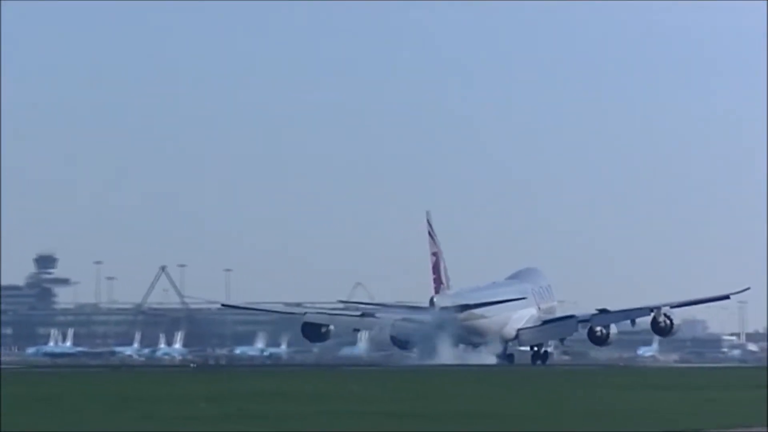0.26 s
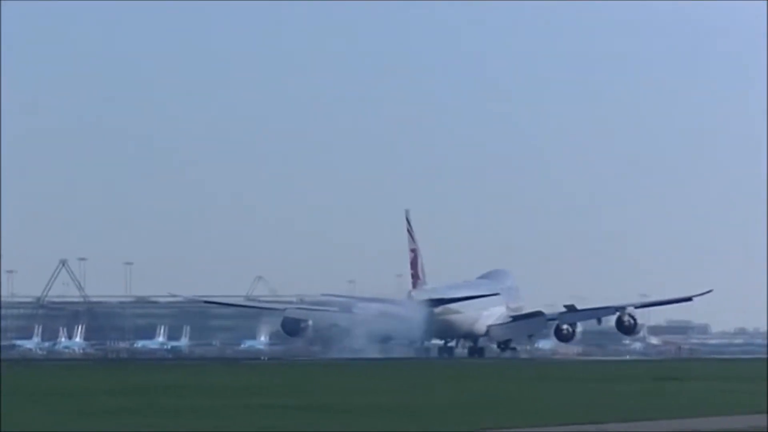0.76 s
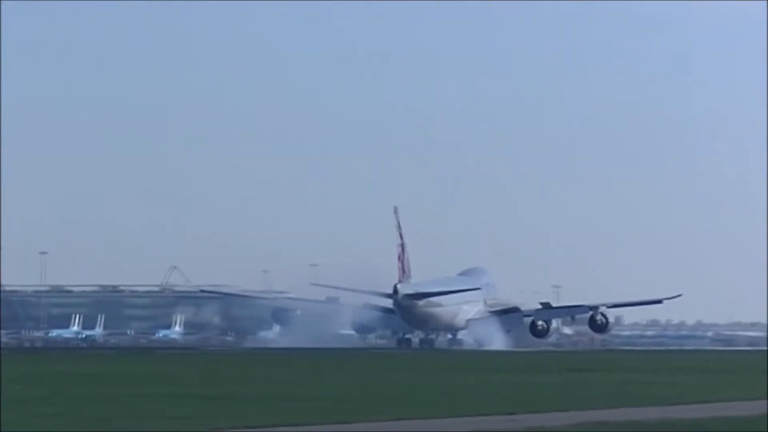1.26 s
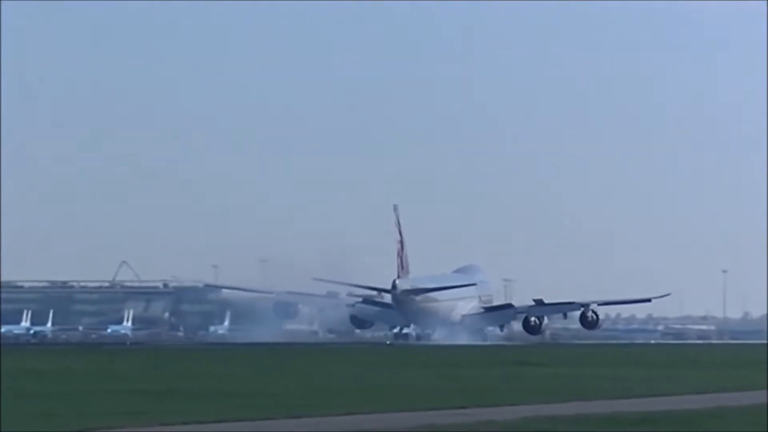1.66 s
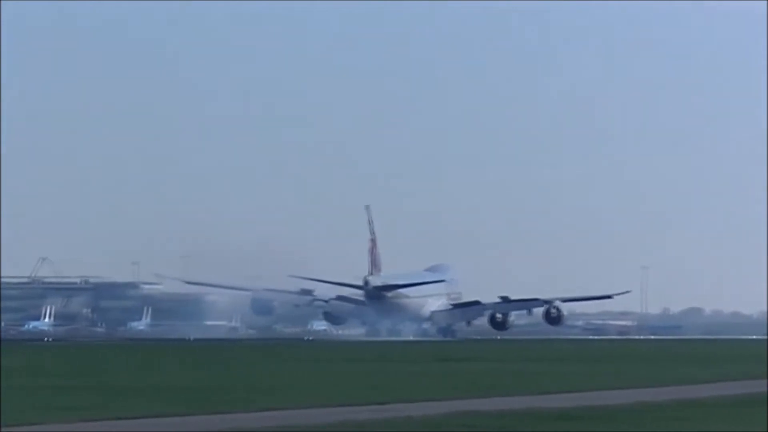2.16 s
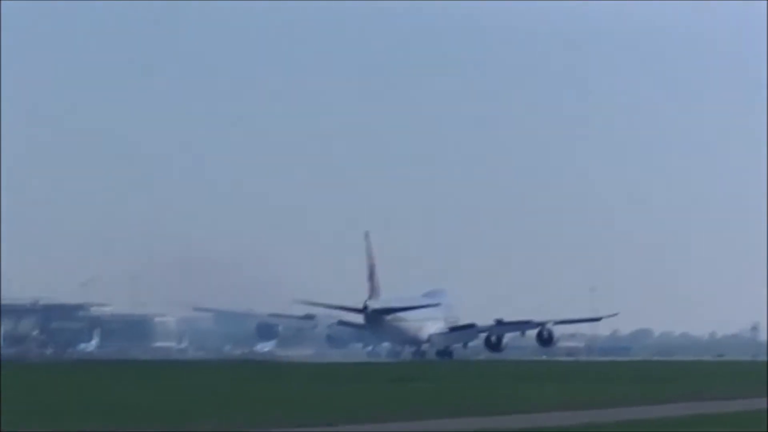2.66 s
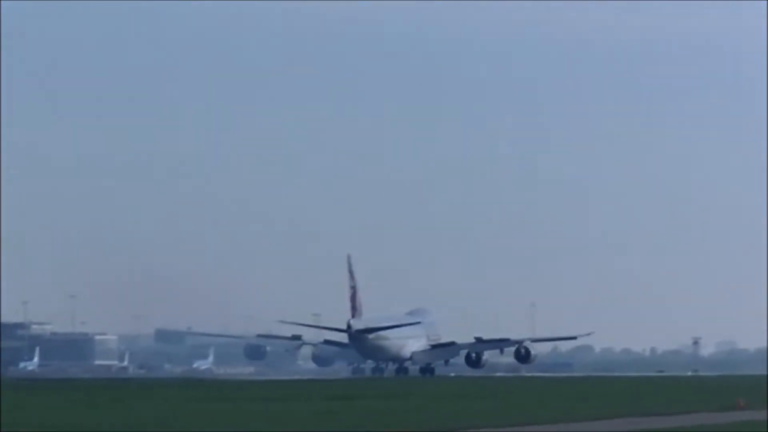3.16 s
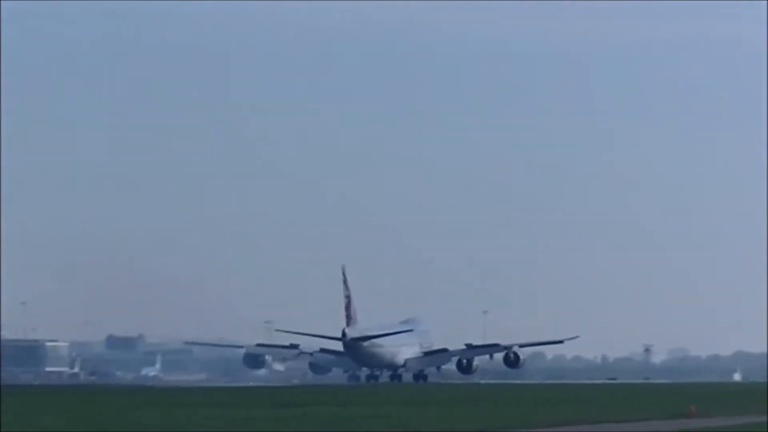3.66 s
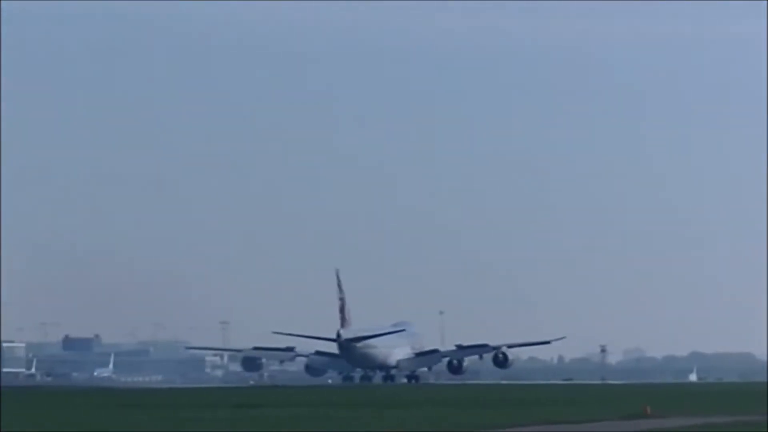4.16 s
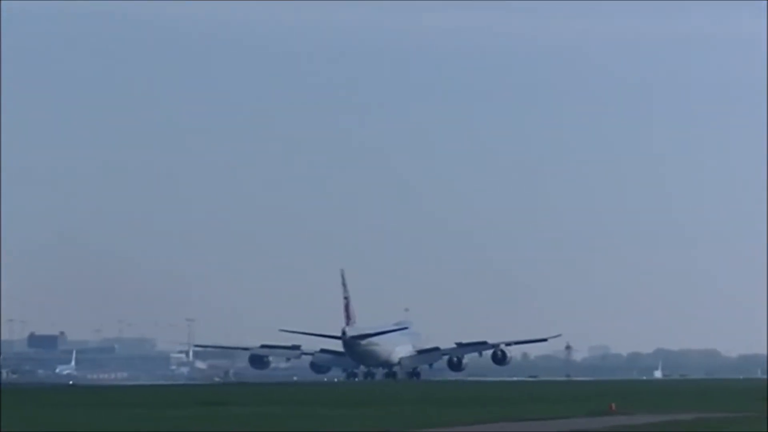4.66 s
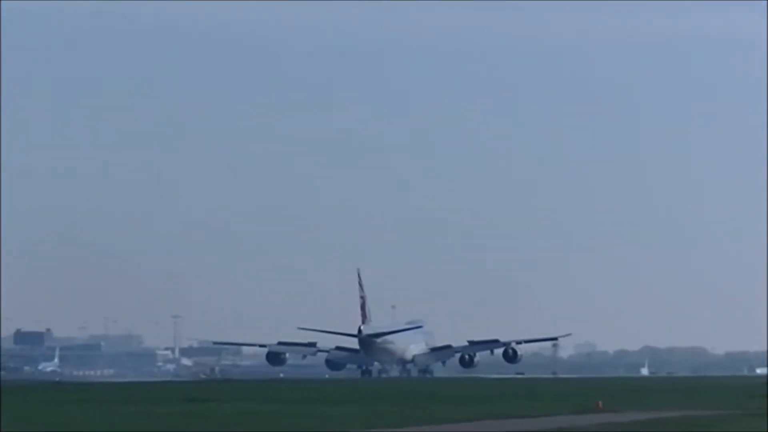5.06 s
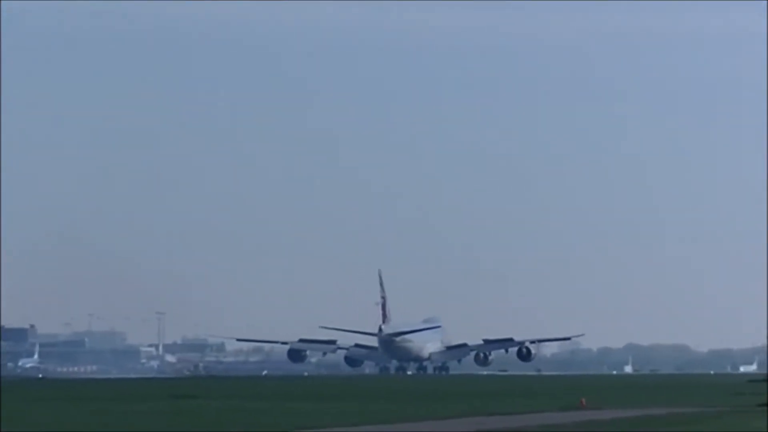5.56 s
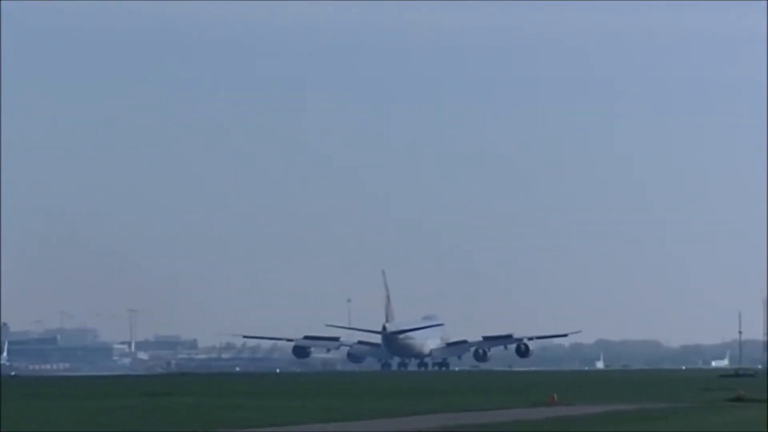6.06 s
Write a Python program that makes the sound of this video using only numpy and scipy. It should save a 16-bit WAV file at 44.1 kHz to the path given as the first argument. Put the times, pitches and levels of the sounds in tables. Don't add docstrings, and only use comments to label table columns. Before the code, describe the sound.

Beside an open runway, a large four-engined jet is already rolling away as the sound begins. From 0 to 2 s a broad, breathy fan rush fades gradually over a mid-low roar, while quick chirps, chips and thin high whistles come from small birds in the grass. The low exhaust rumble wavers with gusty air, lifting around 1.2 s. From 2 to 4 s a nearer bird sings liquid glides, with a short rolling run at 2.6 s; meanwhile the rumble swells to its strongest at about 3.2 to 4.2 s, with soft, rounded thuds. It dips near 5 s, then surges again as the engine rush rises slightly. Chattering birds continue, with falling stepped calls around 5.4 to 5.7 s and a high wavering whistle after 6 s. Faint hiss, thin electronic whine and tiny ticks sit close, the clearest tick at 6.1 s. It stops abruptly around 6.3 s, mid-roar.

```python
import sys
import numpy as np
from scipy import signal
from scipy.io import wavfile
from scipy.ndimage import uniform_filter1d

SR = 44100
rng = np.random.default_rng(int(sys.argv[2]) if len(sys.argv) > 2 else 0)


def transcribe(signal):
    frames = np.atleast_2d(signal).T
    limited = np.clip(frames, -1, 1)
    pcm = np.round(limited * 32767).astype(np.int16)
    wavfile.write(sys.argv[1], SR, pcm)


def amplitude_ratio(level_db):
    exponent = np.asarray(level_db, float) / 20
    return 10 ** exponent


N = 278712

# (time [s], level [dB])
EXHAUST_SWELL = [(0, -38.5), (.36, -35), (.9, -38.5), (1.15, -29), (1.48, -35), (1.66, -31), (1.83, -34.5),
                 (2.15, -32), (2.35, -31), (3.15, -27.5), (3.4, -29), (3.62, -25.5), (4.15, -25.5),
                 (4.95, -32), (5.2, -26), (5.42, -28.5), (6.1, -29.5), (6.32, -31)]
# (frequency [Hz], density [dB per Hz])
RUMBLE_SPECTRUM = [(25, -48), (50, -66), (100, -32), (160, -16.5), (240, -8.5), (310, -1.5), (365, 5),
                   (410, -4), (470, -7), (600, -16), (900, -65.5), (2000, -120)]
CORE_SPECTRUM = [(60, -70.5), (200, -39.5), (430, -4.5), (520, -1), (750, 0.5), (1000, -4.5), (1200, -8.5),
                 (1400, -14), (1700, -50.5), (4000, -120)]
RUSH_SPECTRUM = [(400, -70.5), (1100, -36), (1400, -1.5), (1700, 3.5), (2000, -3), (2600, -5.5),
                 (2900, -14.5), (4300, -17), (4800, -23), (5300, -29), (6500, -42), (12000, -100)]
BLADE_SPECTRUM = [(900, -61), (2000, -20), (3000, -1), (4300, -1.5), (4800, -6), (5300, -16.5), (7000, -29),
                  (12000, -91.5)]
# (frequency [Hz], density [dB per Hz])
HISS_SPECTRUM = [(20, 9), (60, -2), (300, -18), (5500, -0.5), (6300, -1), (7300, -3), (13900, -11),
                 (14600, -14.5), (15500, -23), (16500, -58)]
# (frequency [Hz], likeness [0-1])
LIKENESS = [(40, .5), (65, .85), (110, .98), (290, 1), (640, .99), (1400, .85), (1800, .94), (2700, .86),
            (5500, .88)]
# (frequency [Hz], lead [rad])
LEAD = [(60, -1.1), (130, -.7), (400, -.03), (1050, .3), (1400, 1.), (2100, .1), (3200, .45), (4800, .15)]
# (frequency [Hz], left minus right [dB])
TILT = [(60, 4.5), (150, 1.5), (380, -1.2), (950, -2.5), (2380, -2), (5980, -2), (15000, 1)]
# (frequency [Hz], level [dB rms])
WHINE = [(7800, -89), (7825, -86.5)]
# (time [s], from [Hz], to [Hz], level [dB])
FLICKS = [(.023, 5780, 3980, -60), (.102, 6980, 4880, -69), (.4, 4800, 4400, -58), (.755, 4500, 3080, -59),
          (.91, 4980, 4080, -60), (1.004, 6120, 7420, -71), (1.056, 4780, 6780, -71),
          (2.969, 3760, 2850, -57), (1.998, 5720, 4720, -69), (2.082, 3400, 3900, -57),
          (2.122, 3800, 4500, -59), (2.316, 5000, 3600, -58), (6.125, 3300, 2700, -60),
          (3.16, 5080, 3780, -61), (3.476, 4020, 2920, -50), (3.693, 3510, 2860, -52),
          (3.819, 3880, 2840, -49), (4.823, 4350, 3600, -54), (4.718, 5700, 4080, -66),
          (4.801, 3000, 4300, -57), (4.932, 5480, 3600, -62), (5.04, 5580, 4180, -64),
          (5.186, 7200, 7500, -72), (5.295, 5480, 3080, -61), (5.913, 5000, 4100, -61),
          (6.015, 6500, 7400, -76), (6.055, 6580, 5580, -71), (6.24, 4620, 3820, -61),
          (.535, 6850, 6420, -67)]
# (time [s], length [s], from [Hz], to
# [Hz], level [dB])
CHATTER = [(.16, .08, 3480, 3420, -61), (.53, .03, 3250, 3700, -59), (.735, .015, 4100, 4700, -60),
           (.82, .015, 4450, 4200, -53), (.87, .03, 4300, 4150, -61), (1.147, .02, 5350, 5820, -70),
           (1.235, .015, 5850, 5400, -71), (1.32, .04, 5200, 5200, -68), (1.485, .03, 4300, 3950, -60),
           (1.625, .035, 4050, 3500, -58), (1.69, .015, 3450, 3350, -58), (2.285, .02, 6200, 6800, -71),
           (2.36, .015, 4000, 3300, -62), (2.398, .014, 3950, 3950, -62), (2.47, .012, 3900, 3900, -62),
           (2.568, .012, 4400, 4300, -61), (2.585, .012, 4000, 3950, -60), (3.012, .01, 3900, 3700, -60),
           (3.18, .03, 5300, 5300, -67), (3.225, .012, 6050, 5700, -64), (3.5, .03, 3820, 3800, -62),
           (3.72, .008, 2900, 3400, -57), (3.672, .045, 4350, 4250, -63), (4.3, .028, 3600, 3780, -59),
           (4.338, .025, 3820, 3480, -58), (4.38, .015, 4550, 4500, -56), (4.412, .018, 4200, 4300, -56),
           (4.468, .026, 3680, 3620, -60), (4.518, .037, 4450, 3400, -59), (4.562, .008, 4200, 3200, -60),
           (4.615, .026, 4300, 3850, -54), (4.642, .01, 3900, 3600, -53), (4.652, .008, 3600, 4050, -53),
           (4.66, .012, 4000, 3650, -54), (4.9, .04, 4200, 3650, -60), (5.07, .02, 3700, 3600, -61),
           (5.225, .015, 4200, 3800, -60), (5.41, .015, 7400, 6850, -72), (5.71, .025, 6000, 6000, -72),
           (5.3, .012, 4300, 4200, -57)]
# (time [s], peak [dB])
BUFFETS = [(0.243, -21.5), (0.668, -21), (1.097, -20), (1.174, -16.5), (1.576, -22), (1.617, -18.5),
           (1.659, -20), (1.946, -19.5), (1.998, -20), (2.112, -21), (2.403, -17.5), (2.532, -24.5),
           (2.692, -21), (2.774, -15), (2.934, -19), (3.207, -11.5), (3.315, -16), (3.349, -23),
           (3.46, -15), (3.634, -11.5), (3.771, -15), (3.879, -18.5), (4.105, -17.5), (4.165, -16.5),
           (4.267, -20.5), (4.318, -19), (4.774, -15.5), (4.856, -21), (5.081, -18), (5.14, -16.5),
           (5.263, -18), (5.356, -20), (5.448, -22), (5.577, -17), (5.675, -18), (5.782, -21),
           (5.95, -20.5), (6.014, -17), (6.114, -27), (6.22, -23)]
# (time [s], length [s], centre [Hz], swing [Hz], level [dB])
TRILLS = [(.592, 0.036, 3480, 684, -51.5), (0.6, .06, 6400, 505, -75), (1.43, 0.06, 4360, 120, -57),
          (.3, 0.048, 4200, 903, -59.5), (.755, 0.028, 3450, 600, -56), (1.15, .1, 5550, 400, -71.5),
          (4.38, .05, 4200, 500, -61.5), (4.4, .045, 3600, 700, -59.5), (5.49, .04, 4200, 500, -60),
          (.63, .06, 5700, 500, -72), (4.03, .09, 5300, 430, -71.5), (1.565, 0.022, 6200, 1400, -70),
          (1.853, .11, 3860, 780, -60.5), (1.852, .065, 5440, 200, -69), (2.17, .048, 6000, 1810, -67.5),
          (2.945, 0.028, 6200, 1500, -73), (4.05, 0.12, 4090, 500, -64), (5.047, .04, 3960, 884, -65),
          (5.13, .17, 4230, 296, -64.5), (3.643, 0.066, 4600, 899, -68.5), (4.64, 0.04, 4300, 500, -61.5),
          (5.196, .075, 3540, 300, -58.5), (5.575, .051, 3440, 795, -55.5), (5.64, .1, 5560, 604, -76),
          (5.985, 0.027, 5700, -1000, -69.5), (2.285, .045, 6600, 599, -71.5), (1.43, .05, 4750, 400, -63),
          (5.74, .056, 3460, 905, -57)]
# (time [s], length [s], from [Hz], to [Hz], level [dB])
WARBLER = [(.325, .08, 3080, 2990, -52), (.833, .036, 4220, 4330, -52), (1.515, .06, 3880, 3470, -52),
           (1.527, .04, 4220, 4310, -53), (1.585, .041, 3600, 3450, -59), (1.994, .061, 2450, 2750, -55),
           (2.14, .014, 3450, 3700, -49), (2.154, .032, 3700, 2770, -47), (2.188, .032, 2770, 3800, -47),
           (2.216, .024, 3780, 3850, -44), (2.368, .014, 2980, 3200, -52), (2.382, .036, 3200, 2760, -48),
           (2.51, .04, 4150, 4570, -52), (2.83, .055, 3010, 3510, -47), (2.946, .024, 3920, 3760, -51),
           (2.981, .02, 2830, 2950, -55), (3.172, .028, 3760, 3800, -55), (3.271, .074, 2800, 3000, -50),
           (3.357, .042, 3120, 2950, -50), (3.451, .032, 3780, 3850, -46), (3.599, .078, 3420, 3220, -45),
           (3.672, .024, 3400, 3510, -50), (3.705, .014, 2860, 2860, -49), (3.796, .027, 4070, 3900, -45),
           (3.834, .048, 2780, 2880, -47), (3.974, .026, 2720, 3210, -47), (3.998, .018, 3210, 2580, -47)]
# (time [s], peak [dB], ring [Hz], decay t60 [s], broad snap over ring [ratio])
TICKS = [(.409, -50, 4600, .012, .5), (1.521, -58, 8500, .015, 2.2), (3.219, -63, 6500, .015, 2.2),
         (3.311, -60, 8500, .015, 2.2), (3.551, -57, 8100, .015, 1.8), (4.289, -68, 7500, .12, 3),
         (4.871, -58, 6500, .012, 1.2), (6.107, -40, 1850, .045, .07), (6.108, -51, 3400, .012, .2),
         (6.182, -52, 4200, .012, .4), (2.447, -54, 3000, .012, .8)]
# (time [s], length [s], from [Hz], to [Hz], level [dB])
WHISTLES = [(.548, .024, 6420, 6420, -66), (.467, .045, 5620, 5470, -63), (.57, .13, 6560, 6660, -63),
            (1.027, .018, 7190, 7210, -74), (1.165, .07, 5820, 5850, -71), (1.955, .045, 5940, 5960, -62),
            (2.03, .06, 5940, 5940, -72), (2.3, .03, 6900, 6600, -68), (2.43, .026, 3920, 3920, -57),
            (2.821, .09, 5800, 5060, -67), (2.975, .04, 5300, 5300, -72), (3.12, .075, 5230, 5300, -60),
            (3.235, .075, 5300, 5020, -67), (3.31, .046, 5250, 5300, -68), (3.599, .031, 4350, 4350, -64),
            (3.692, .031, 3950, 3850, -58), (4.274, .046, 3650, 3700, -58), (5.78, .08, 3600, 4050, -62),
            (5.928, .152, 4950, 4300, -56)]
# (time [s], pitch [Hz], level [dB])
ARCS = [
    [(1.085, 5350, -66), (1.12, 5230, -60), (1.19, 5210, -55), (1.24, 5200, -58), (1.305, 5170, -66)],
    [(5.322, 3180, -62), (5.35, 2960, -55), (5.385, 2900, -53), (5.43, 2960, -56), (5.475, 3060, -63)],
    [(6.066, 5850, -64), (6.09, 5450, -55), (6.15, 5200, -54), (6.18, 5290, -55), (6.24, 5230, -58),
     (6.26, 5170, -55), (6.32, 5230, -56)],
]
# (time [s], pitch [Hz], level [dB])
CHIPS = [(3.38, 5700, -70), (3.43, 5700, -70), (3.51, 5700, -71), (3.59, 5700, -71), (3.63, 5700, -71),
         (4.393, 4150, -55), (4.4, 4300, -52), (4.406, 3850, -56), (4.574, 3320, -52), (4.812, 4350, -58),
         (4.829, 3730, -49), (4.844, 3400, -57), (5.547, 4370, -61), (5.569, 4350, -58), (5.732, 4420, -60)]
SEE_STARTS_S = [3.684, 3.866, 4.068, 4.268]
# (delay [s], length [s], from [Hz], to [Hz], level [dB])
SEE_PARTS = [
    (0, .066, 6920, 6610, -71),
    (.066, .07, 6650, 6650, -78),
]
STEP_STARTS_S = [5.4, 5.488, 5.58, 5.675]
# (delay [s], length [s], from [Hz], to [Hz], level [dB])
STEP_PARTS = [
    (0, .012, 6600, 5550, -68),
    (.017, .012, 4270, 4050, -55),
    (.037, .008, 3730, 3530, -57),
]


def evened(x):
    return x / np.sqrt(np.mean(x ** 2) + 1e-20)


def read(points, hz):
    f, value = np.transpose(points)
    return np.interp(np.log(hz + 1), np.log(f + 1), value)


def add(mix, s, sound):
    part = mix[:, round(s * SR):][:, :sound.shape[1]]
    part += sound[:, :part.shape[1]]


def drift(count, size):
    return evened(uniform_filter1d(rng.standard_normal(count), size=size))


def noise(spectrum, likeness, patchy_db, swell_db):
    frames, hz = N // 256 + 5, np.fft.rfftfreq(1024, 1 / SR)
    a, b, c, d, patches = rng.standard_normal((frames, len(hz), 5)).T
    patches = uniform_filter1d(patches, size=10, axis=0)
    patches = evened(uniform_filter1d(patches, size=16, axis=1))
    t = np.arange(frames) * 256 / SR
    gust_hz = np.geomspace(3, 18, num=20)
    swell = evened(sum(np.sin(2 * np.pi * (f * t + rng.random())) / np.sqrt(f) for f in gust_hz))
    same = np.clip(likeness * read(LIKENESS, hz), 0, 1)[:, None]
    left = a + 1j * b
    right = same * left + np.sqrt(1 - same ** 2) * (c + 1j * d)
    ports = amplitude_ratio(read(TILT, hz) / 2) * np.exp(.5j * read(LEAD, hz))
    z = np.array([left, right]) * np.array([ports, 1 / ports])[:, :, None]
    z *= amplitude_ratio(read(spectrum, hz)[:, None] + patchy_db * patches + swell_db * swell)
    return evened(signal.istft(z, nperseg=1024, noverlap=768)[1][:, :N])


def whistle(hz, db, hoarse_hz=25):
    flutter, wobble = drift(len(hz), 120), drift(len(hz), 120)
    soft = signal.windows.tukey(len(hz), min(1, 0.0083 * SR / len(hz)))
    phase = 2 * np.pi * (np.cumsum(hz + hoarse_hz * wobble) / SR + rng.random())
    pan_db, lead_rad = -1.5, .5
    if hz.mean() >= 4900:
        pan_db, lead_rad = rng.choice([(-3.5, -1.5), (2.5, -1.2), (1.5, 1.1)])
    side = np.array([[.5], [-.5]])
    level = np.sqrt(2) * amplitude_ratio(db + side * pan_db) * (1 + .22 * flutter) * soft
    return level * np.sin(phase + side * lead_rad)


def breath(u, peak, ends_db):
    return 1.5 + ends_db * np.where(u < peak, 1 - u / peak, (u - peak) / (1 - peak)) ** 2


def slurs(events):
    out = np.zeros((2, N))
    for s, length_s, from_hz, to_hz, db in events:
        u = np.linspace(-.1, 1.1, round(1.2 * length_s * SR))
        hz = from_hz + (to_hz - from_hz) * u
        add(out, s - .1 * length_s, whistle(hz, db + 1.3, hoarse_hz=50))
    return out


def calls(starts_s, parts):
    return slurs([(s + delay_s, *part) for s in starts_s for delay_s, *part in parts])


def jet():
    t = np.arange(N) / SR
    rumble_db = np.interp(t, *np.transpose(EXHAUST_SWELL))
    swell_db = rumble_db - rumble_db[0]
    away = 1 - np.exp(-t / 1.28)
    spool_s = np.maximum(t - 4.82, 0)

    def fan_gain(first_db, lost_db, spool_db_per_s, swell_share):
        return amplitude_ratio(first_db - lost_db * away + spool_db_per_s * spool_s + swell_share * swell_db)

    rumble = amplitude_ratio(rumble_db) * noise(RUMBLE_SPECTRUM, 0.99, patchy_db=1.13, swell_db=0.42)
    core = fan_gain(-38.5, 6.5, 3, 0.2548) * noise(CORE_SPECTRUM, 1, patchy_db=1.2, swell_db=0.1)
    rush = fan_gain(-42.5, 8.5, 2.5, -0.0315) * noise(RUSH_SPECTRUM, 0.98, patchy_db=0.68, swell_db=0.04)
    blades = fan_gain(-52, 11.5, -5, 0.01) * noise(BLADE_SPECTRUM, 1, patchy_db=1.5, swell_db=.8)
    return buffeted(rumble) + core + rush + blades


def hiss():
    return amplitude_ratio(-68) * noise(HISS_SPECTRUM, 0, patchy_db=.7, swell_db=.3)


def whine():
    t = np.arange(N) / SR
    return sum(np.sqrt(2) * amplitude_ratio(db) * np.sin(2 * np.pi * hz * t) for hz, db in WHINE)


def twitter(count=560):
    out = np.zeros((2, N))
    for when, long, high, glide, loud in rng.random((count, 5)):
        s, hz = when * N / SR, 3200 + 1500 * high + 900 * high ** 12
        u = np.linspace(-.5, .5, round((.006 + .025 * long ** 2) * SR))
        db = -66 - 10 * max(hz - 4400, 0) / 1000 + 8 * loud ** 2
        db += -5 * np.exp(-((s - 3.0) / 1.1) ** 4)
        add(out, s, whistle(hz + 1400 * (.3 - glide) * u, db, hoarse_hz=89.5))
    return out


def field(x):
    t = np.arange(SR // 4) / SR
    sign = rng.choice([-1., 1.], (2, len(t)))
    hit = rng.random((2, len(t))) < 2000 / SR
    taps = sign * hit * amplitude_ratio(-60 * t / 0.34) * (t > .004)
    return signal.fftconvolve(x, taps / np.linalg.norm(taps[0]), axes=1)[:, :N]


def flicks():
    hz_per_s, shortest_s = 62000, .012
    return slurs([(s, max(abs(b - a) / hz_per_s, shortest_s), a, b, db) for s, a, b, db in FLICKS])


def chatter():
    return slurs(CHATTER)


def buffeted(rumble):
    thuds, cover = np.zeros((2, N)), np.zeros((2, N))
    eddy_hz, rise_s, fall_s = 356.4, 0.0029, 0.0065
    t = np.arange(-.015, .04, 1 / SR)
    shape = np.exp(-.5 * (t / np.where(t < 0, rise_s, fall_s)) ** 2)
    side_db = read(TILT, eddy_hz) * np.array([[.5], [-.5]])
    for (s, db), (high, turn) in zip(BUFFETS, rng.random((len(BUFFETS), 2))):
        wave = np.sin(2 * np.pi * (eddy_hz * (.9 + .2 * high) * t + turn))
        add(thuds, s - .009, amplitude_ratio(db - 2 + side_db) * shape * wave)
        add(cover, s - .009, np.array([shape, shape]))
    return rumble * (1 - 0.59 * np.minimum(cover, 1)) + thuds


def trills():
    out = np.zeros((2, N))
    for s, length_s, hz, swing_hz, db in TRILLS:
        flicks_per_s = 100 * (1 + .5 * drift(round(length_s * SR), 300))
        flick = np.cumsum(flicks_per_s) / SR % 1
        pulse = np.sin(np.pi * flick) * 2.5 * np.hanning(len(flick)) ** 0.18
        add(out, s, whistle(hz + swing_hz * (.5 - flick), db, hoarse_hz=90 + .25 * swing_hz) * pulse)
    return out


def warbler():
    out = np.zeros((2, N))
    for s, length_s, from_hz, to_hz, db in WARBLER:
        u = np.linspace(0, 1, round((length_s + .008) * SR))
        bend = 1 + ((to_hz - from_hz) / 2000) ** 2
        bent = u ** bend if to_hz < from_hz else 1 - (1 - u) ** bend
        gone = np.sin(np.pi / 2 * bent) ** 2
        hz = from_hz + (to_hz - from_hz) * gone
        add(out, s - .004, whistle(hz, db + breath(u, peak=.45, ends_db=-8)))
    return out


def ticks():
    out = np.zeros((2, N))
    t = np.arange(3000) / SR
    for s, db, hz, t60_s, snap in TICKS:
        burst = uniform_filter1d(rng.standard_normal((2, 3000)), size=2)
        ring = np.sin(2 * np.pi * hz * t) + snap * burst
        add(out, s, amplitude_ratio(db - 60 * t / t60_s) * np.minimum(t / .0004, 1) * ring)
    return out


def whistles():
    out = np.zeros((2, N))
    for s, length_s, from_hz, to_hz, db in WHISTLES:
        u = np.linspace(0, 1, round((length_s + .008) * SR))
        hz = to_hz + (from_hz - to_hz) * (1 - u) ** 4
        add(out, s - .004, whistle(hz, db + breath(u, peak=.3, ends_db=-12)))
    return out


def arcs():
    out = np.zeros((2, N))
    for s, hz, db in map(np.transpose, ARCS):
        t = np.arange(s[0], s[-1], 1 / SR)
        bent_hz = uniform_filter1d(np.interp(t, s, hz), size=600)
        add(out, s[0], whistle(bent_hz, np.interp(t, s, db), hoarse_hz=15))
    return out


def roll():
    out = np.zeros((2, N))
    length_s, rolls_per_s, swing_hz = .16, 42, 170
    from_hz, sink_hz_per_s, floor_hz = 4050, 10500, 3130
    t = np.arange(0, length_s, 1 / SR)
    depth = np.clip(t / .03 - .7, 0, 1) * np.clip(4 - t / .045, .3, 1)
    swing = np.cos(2 * np.pi * rolls_per_s * (t - .043)) * depth
    hz = np.maximum(from_hz - sink_hz_per_s * t, floor_hz) + swing_hz * swing
    add(out, 2.606, whistle(hz, -47 + 2 * swing + breath(t / length_s, peak=.15, ends_db=-7)))
    return out


def chips():
    return slurs([(s, .015, hz, hz - 100, db) for s, hz, db in CHIPS])


def sees():
    return calls(SEE_STARTS_S, SEE_PARTS)


def steps():
    return calls(STEP_STARTS_S, STEP_PARTS)


def scene():
    steady = jet() + hiss() + whine() + ticks()
    far = twitter()
    song = flicks() + chatter() + trills() + warbler() + whistles() + arcs() + roll()
    song += chips() + sees() + steps()
    return steady + song + far + field(amplitude_ratio(-7) * song + amplitude_ratio(-4) * far)


def band_limit(x):
    return signal.sosfilt(signal.butter(12, 15650, fs=SR, output="sos"), x)


def record(dry):
    soft_ends = .65 + .35 * signal.windows.tukey(N, .004 * SR / N)
    return band_limit(dry * soft_ends)


dry = scene()
out = record(dry)
transcribe(out)
```